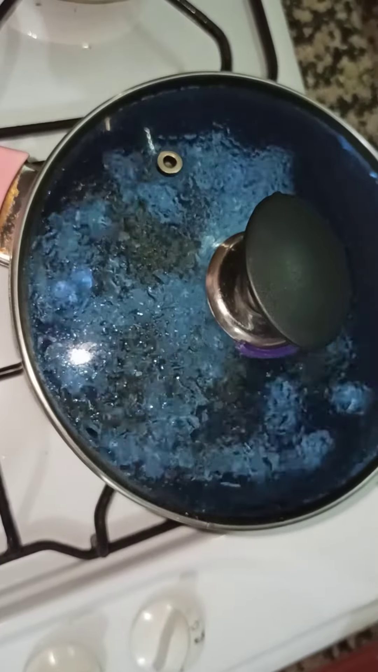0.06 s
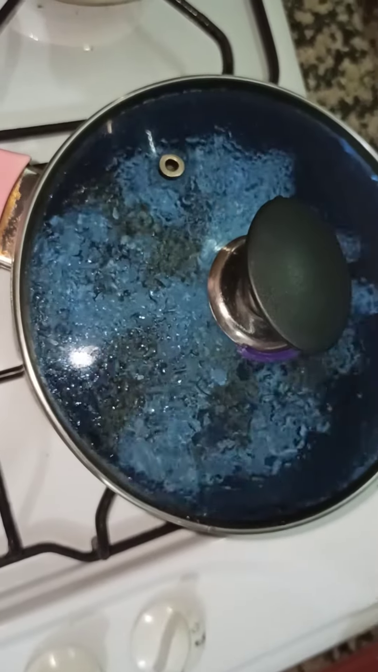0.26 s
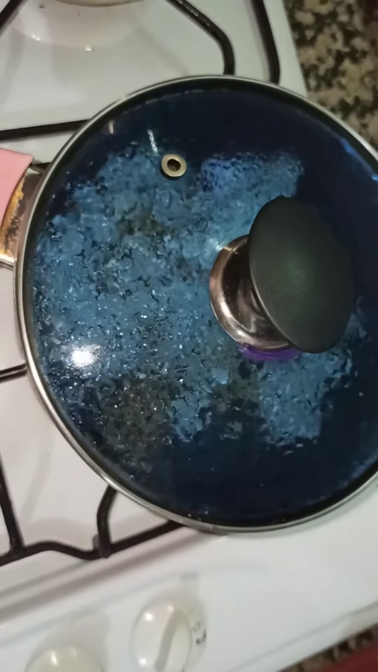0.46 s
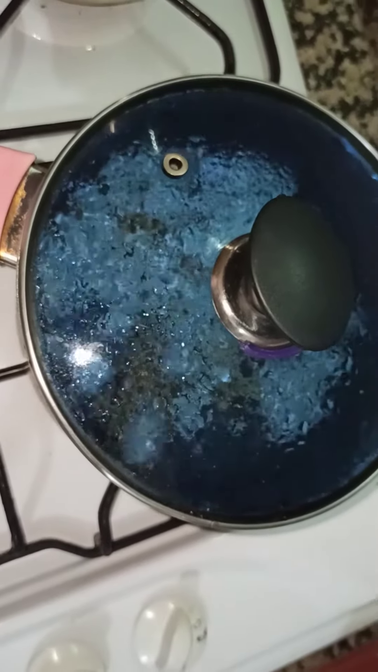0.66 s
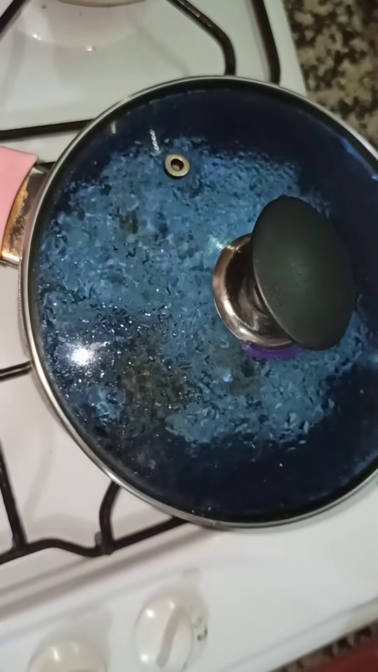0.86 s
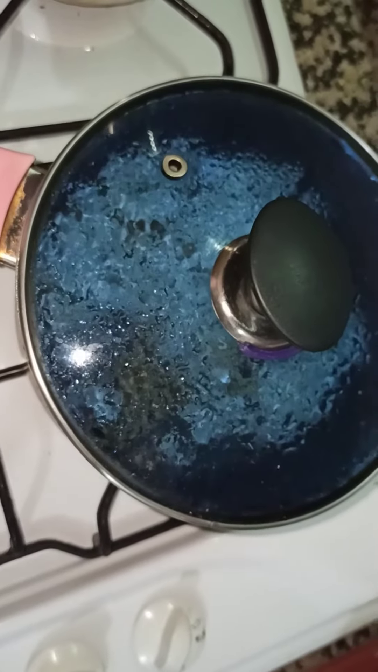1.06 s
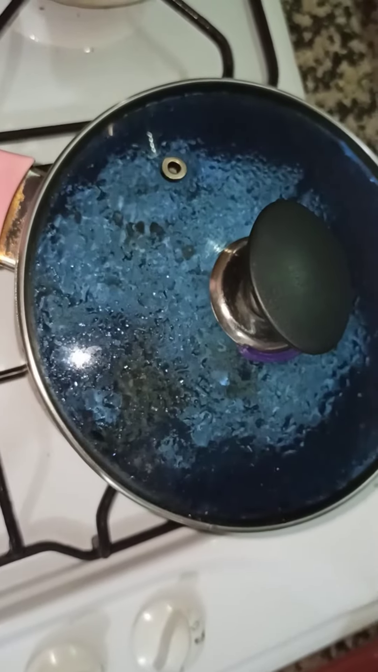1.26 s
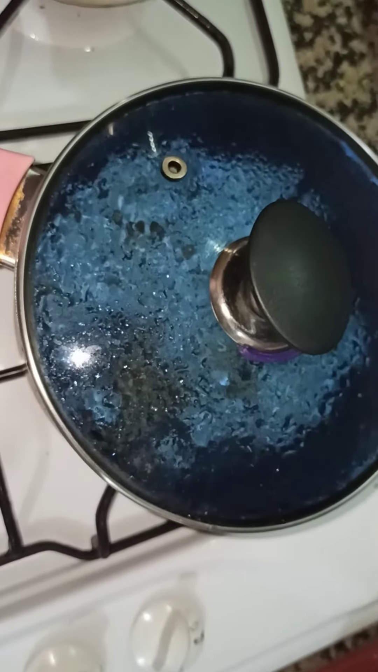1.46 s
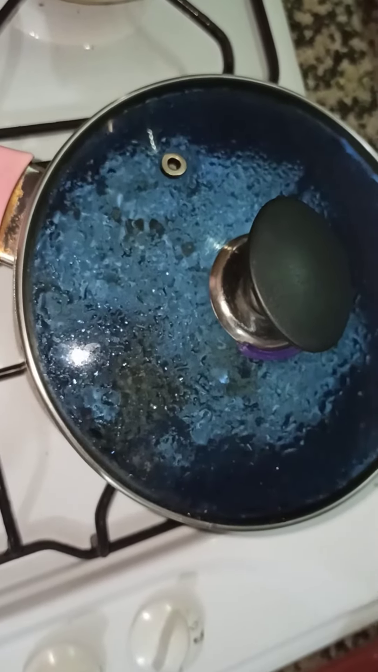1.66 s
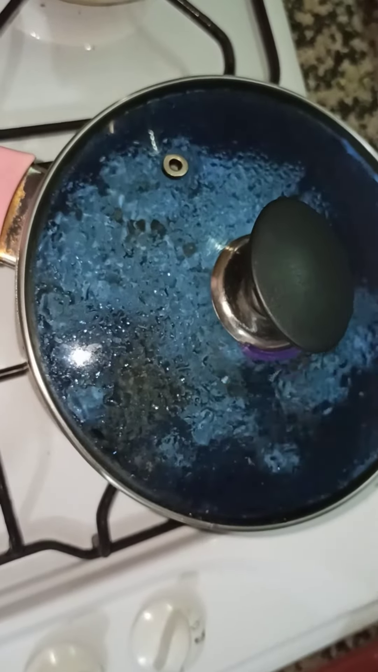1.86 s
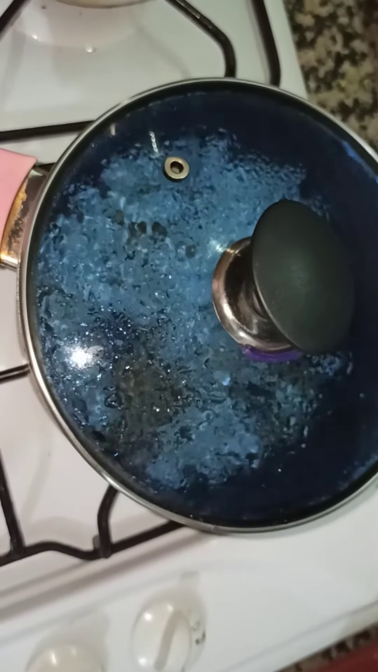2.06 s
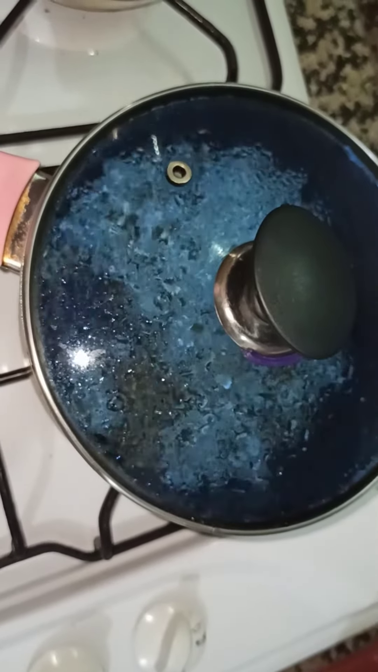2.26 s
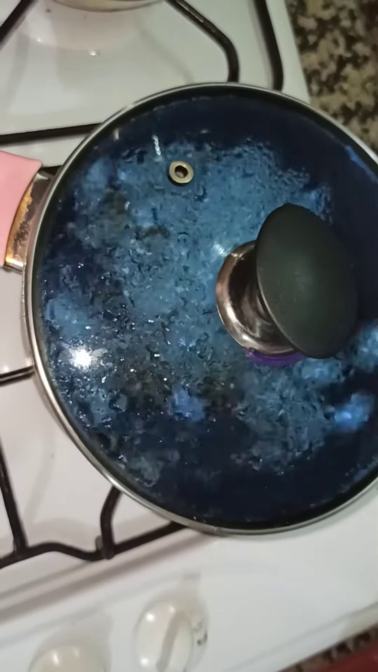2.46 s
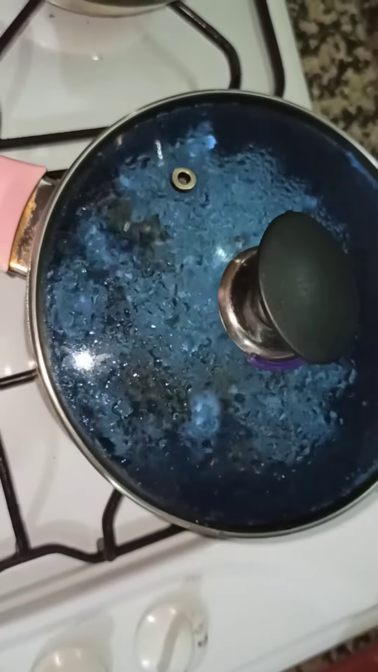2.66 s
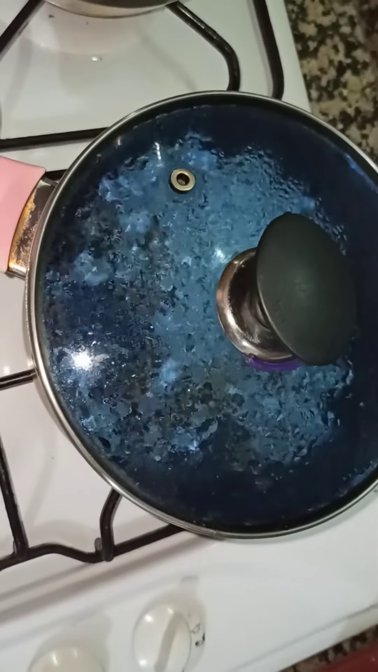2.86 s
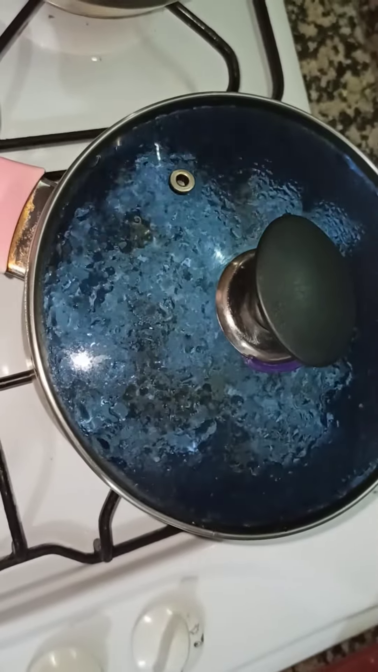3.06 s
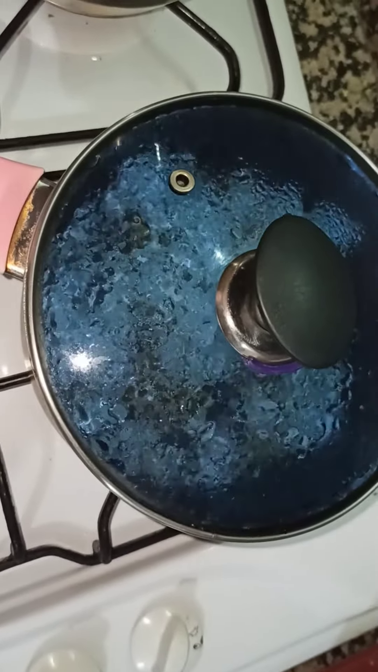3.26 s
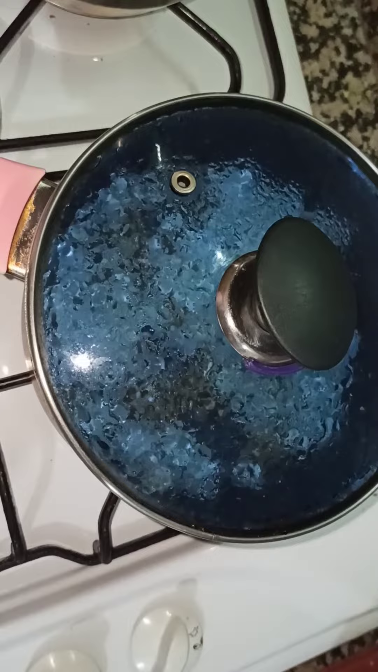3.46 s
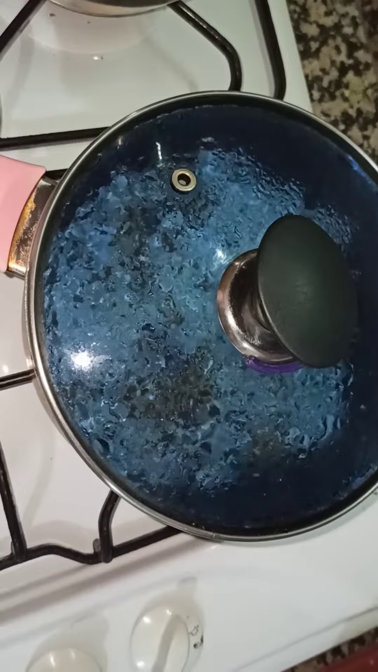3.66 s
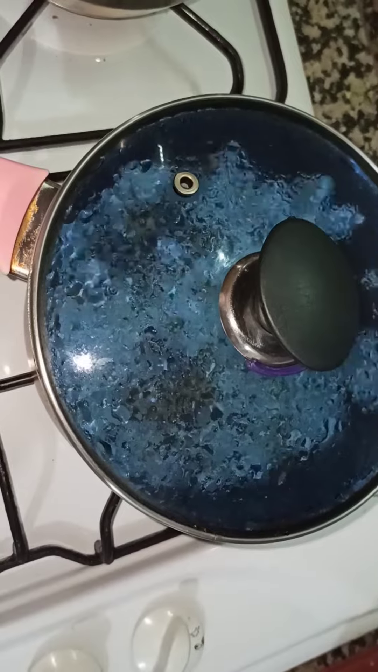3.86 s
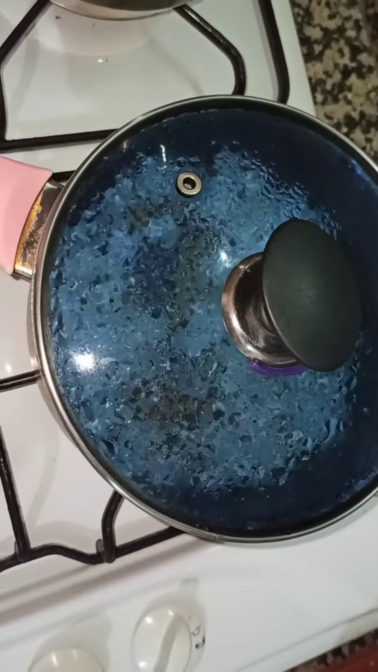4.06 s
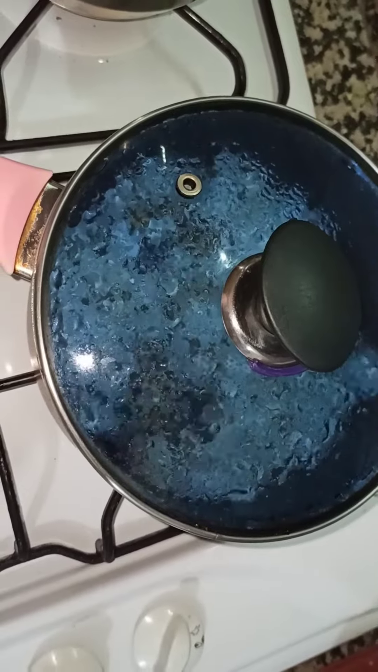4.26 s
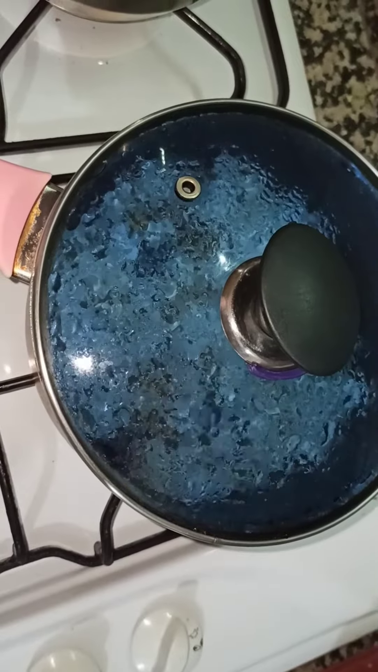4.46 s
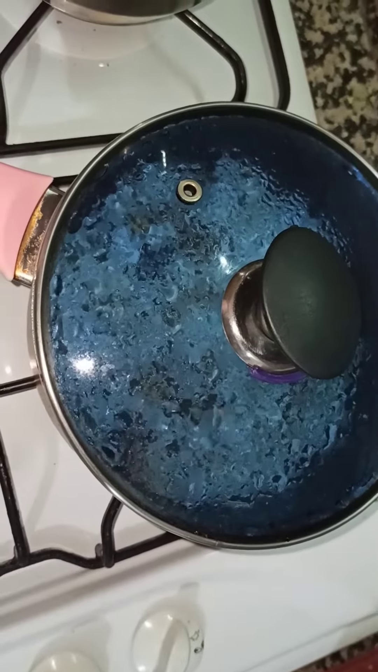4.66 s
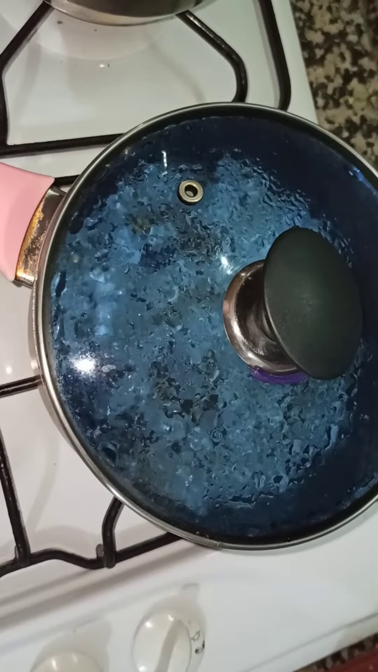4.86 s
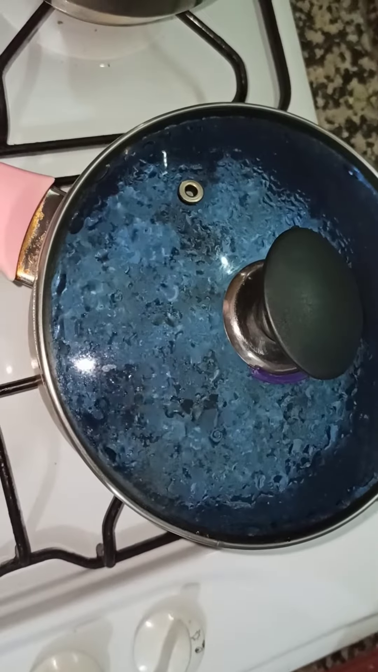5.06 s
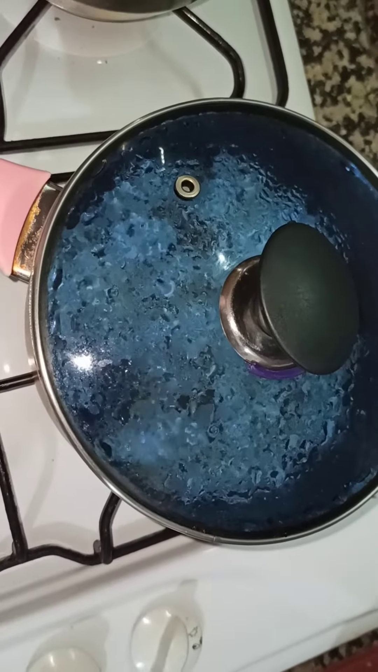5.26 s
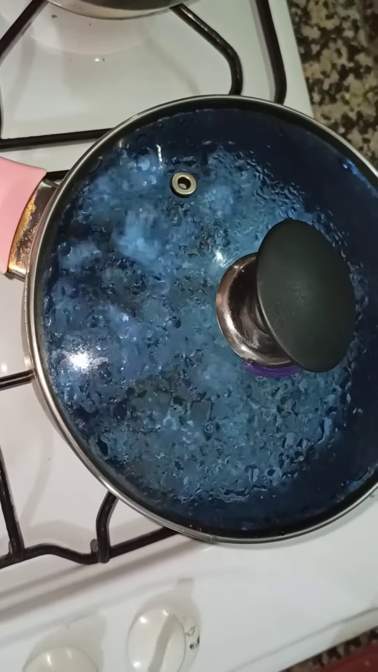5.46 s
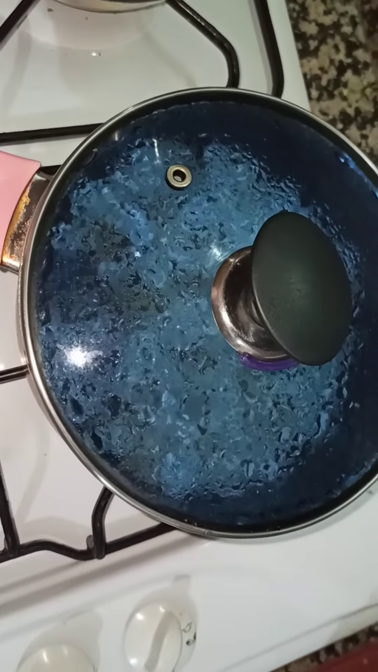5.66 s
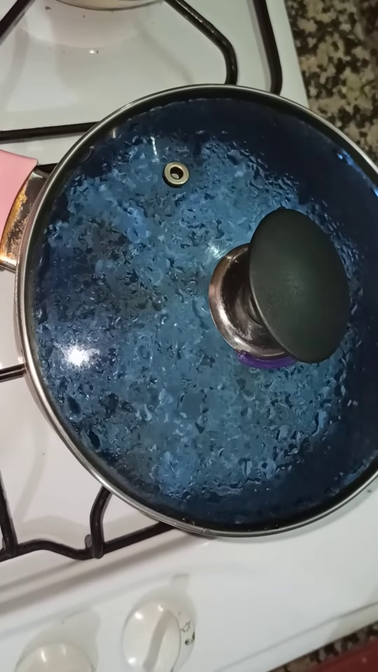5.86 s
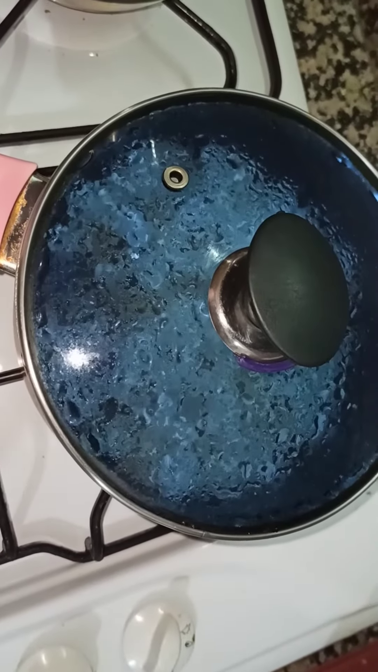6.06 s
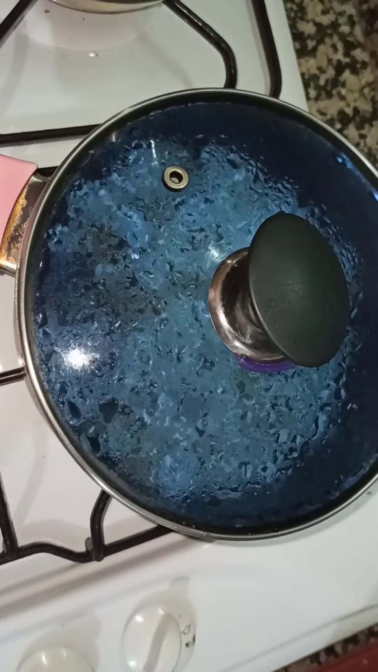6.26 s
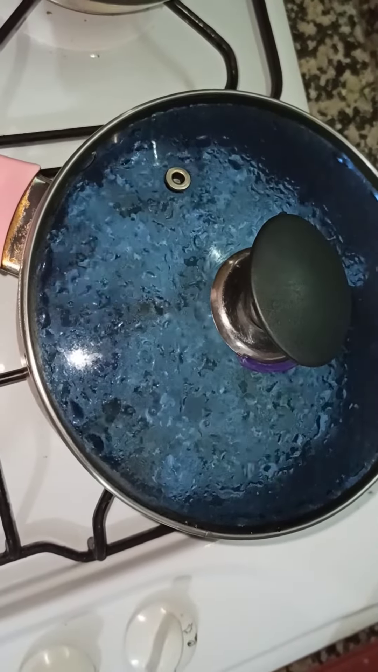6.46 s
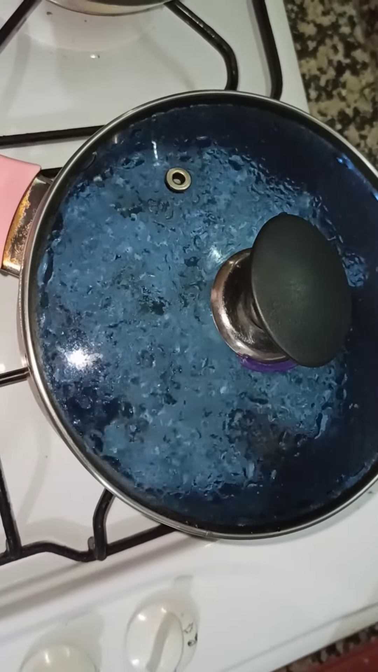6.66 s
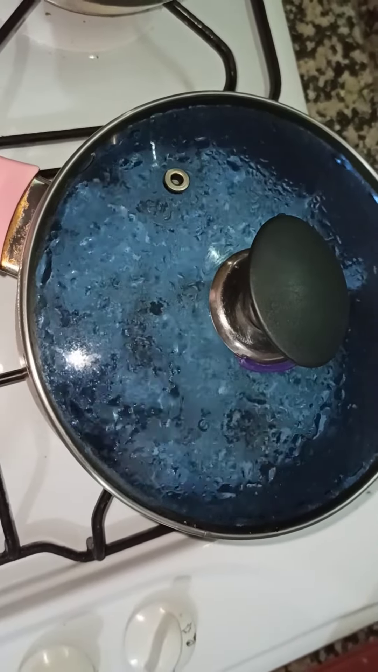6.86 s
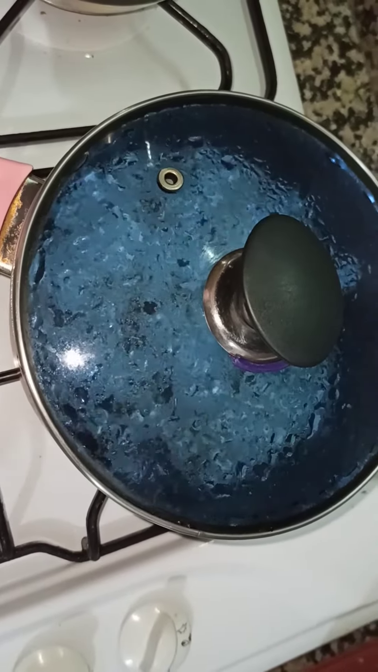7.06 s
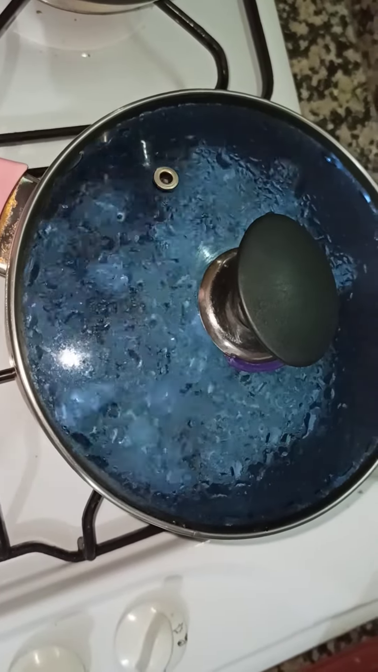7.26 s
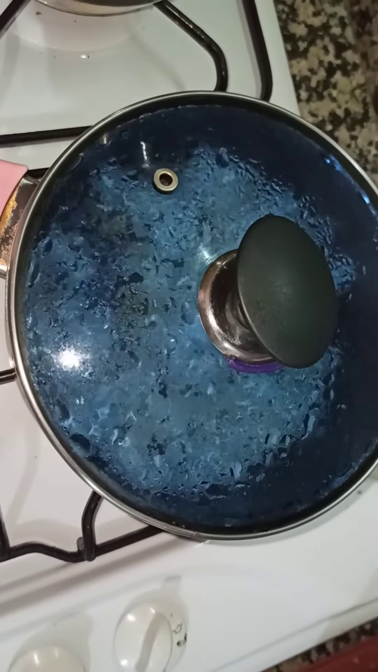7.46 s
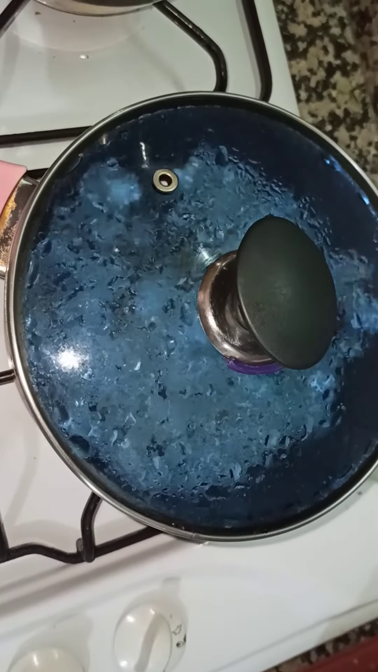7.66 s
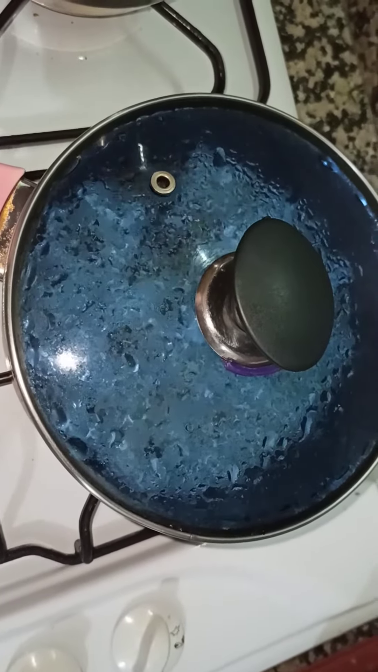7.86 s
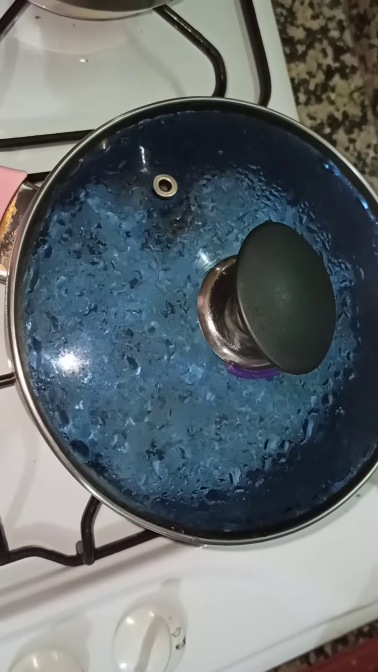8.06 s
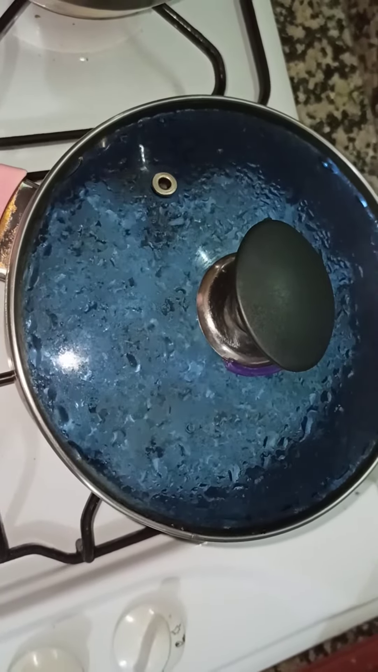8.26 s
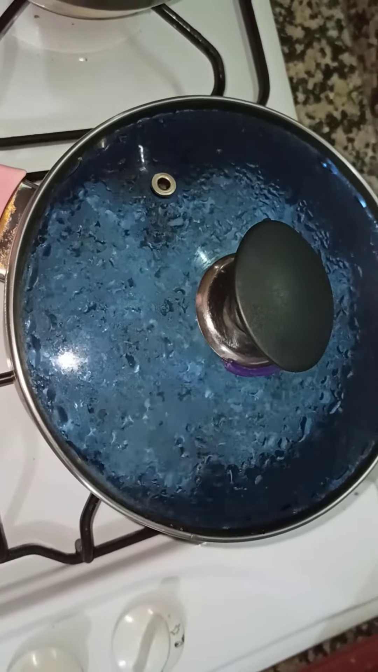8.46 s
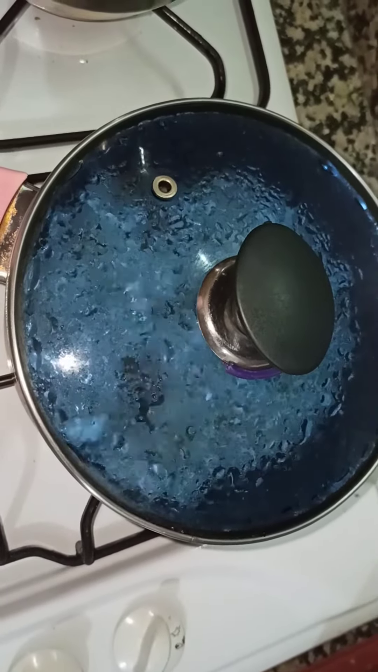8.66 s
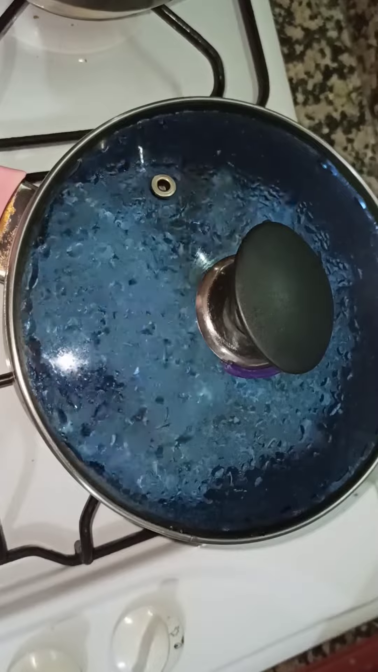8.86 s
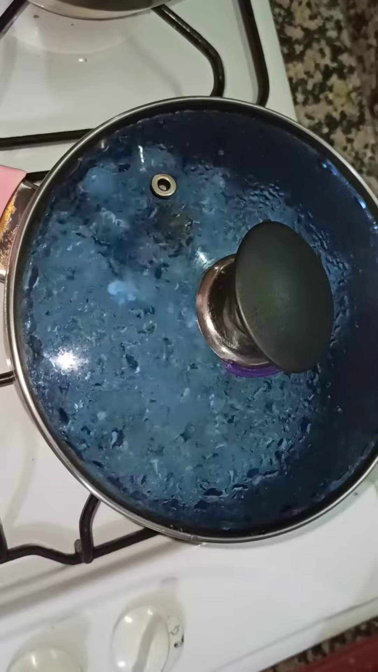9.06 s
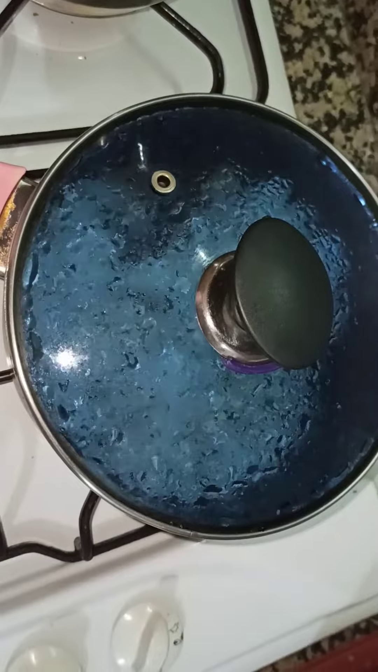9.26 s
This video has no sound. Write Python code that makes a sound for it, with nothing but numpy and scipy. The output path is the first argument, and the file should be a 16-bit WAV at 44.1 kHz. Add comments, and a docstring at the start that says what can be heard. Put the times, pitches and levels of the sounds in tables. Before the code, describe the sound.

Close above a lidded pot on a stove, popcorn is already popping over a faint, steady sizzle and low hum. From 0 to 0.8 s sharp cracks and weaker ticks come quickly, each with a small pot thump and a very short glassy ring, while loose kernels rattle. A dull kernel knock falls at 0.9 s, then a lull of about a second leaves mostly sizzle and fading rattle. Popping resumes at 1.8 s, with a strong crack at 2.1 s and uneven clusters until 5.5 s. Only one weak pop interrupts the gap before 6.3 s. The densest, loudest run comes from about 6.5 to 7.7 s. Pops then space out slightly but continue to about 9.3 s, with several woody knocks from 8.6 to 9.2 s and livelier rolling kernels at the end. The kitchen echo is short and faint.

```python
"""Popcorn pops in a covered pot with a glass lid on a gas stove, heard from close above.
From the start a faint sizzle and hum (shaped noise) lie below. Each pop cracks (noise bursts), thumps the
pot and rings the lid (driven resonators); thrown and loose kernels rattle and rumble on (gated noise, short
rings), and a short echo (feedback delays) follows. From 0.9 s single kernels knock dully on the wall."""
import sys
import numpy as np
from scipy import signal
from scipy.fft import rfft, irfft, next_fast_len
from scipy.io import wavfile

SR = 44100
rng = np.random.default_rng(int(sys.argv[2]) if len(sys.argv) > 2 else 0)


def dump(signal):
    """Clip the signal to [-1, 1] and save it as 16-bit WAV at the path in sys.argv[1]."""
    limited = np.clip(np.atleast_2d(signal).T, -1, 1)
    pcm = np.round(limited * 32767).astype(np.int16)
    wavfile.write(sys.argv[1], SR, pcm)


def makeup_ratio(level_db):
    """Linear amplitude ratio for a level in decibels (20 dB per factor of ten)."""
    decades = np.asarray(level_db, float) / 20
    return 10 ** decades


N = 411012


def rms_one(x):
    """Scale to rms 1."""
    return x / np.sqrt(np.mean(x ** 2) + 1e-20)


def at_hz(points, hz):
    """Read a table on a log-frequency axis."""
    points_hz, values = np.transpose(points)
    return np.interp(np.log(hz), np.log(points_hz), values)


def butter(x, hz, kind):
    """Second-order Butterworth filter design, applied once."""
    return signal.sosfilt(signal.butter(2, hz, kind, fs=SR, output="sos"), x)


# Left-right correlation of noise. Each row: frequency in Hz, likeness from 0 to 1.
LIKENESS = [(60, 1), (150, 0.9), (300, 0.9), (700, 0.62), (2000, 0), (15000, 0.27)]


def stereo_noise(spectrum):
    """Noise of a given spectrum, held flat above 8400 Hz, most alike left and right in the bass; rms 1."""
    size = next_fast_len(N)
    hz = np.maximum(np.arange(size // 2 + 1) * SR / size, 1)
    colour = makeup_ratio(at_hz(spectrum, np.minimum(hz, 8400)))
    mid, side = rfft(rng.standard_normal((2, size))) * colour
    alike = np.clip(at_hz(LIKENESS, hz), 0, 1)
    pair = np.sqrt(1 + alike) * mid + np.sqrt(1 - alike) * side * [[1], [-1]]
    return rms_one(irfft(pair, size)[:, :N])


# Sizzle and hum spectrum. Each row: frequency in Hz, relative density in dB per Hz.
HUSH_SPECTRUM = [(18, -58), (30, -47), (97, -6), (129, -7.5), (156, -32.5), (239, -30), (1370, -35),
                 (1610, -24.5), (2730, -43), (4290, -31), (5580, -48.5), (6440, -25), (9000, -40),
                 (11700, -73), (19800, -120)]
HUSH_DB = -56.5


def hush():
    """Sizzle and kitchen hum as one steady shaped noise."""
    return makeup_ratio(HUSH_DB) * stereo_noise(HUSH_SPECTRUM)


def ring(force, modes):
    """Two-pole resonators: a unit click sets each mode ringing as a decaying sine of its own height."""
    out = 0
    for hz, level_db, t60_s in modes:
        radius = makeup_ratio(-60 / (t60_s * SR))
        w = 2 * np.pi * hz / SR
        poles = [1, -2 * radius * np.cos(w), radius * radius]
        out = out + signal.lfilter([0, makeup_ratio(level_db) * np.sin(w)], poles, force + 1e-18)
    return out


# Pops and kernel hits. Each row: time in seconds, relative levels in dB of the crack, the blow on the pot
# and the strike on the lid, decay scale of the crack in seconds.
POPS = [(0.0044, -18.5, -33.5, -34.5, 0.062), (0.0343, -30.5, -47, -66, 0.2),
        (0.1102, -29, -35, -36, 0.046), (0.1236, -12, -34, -28.5, 0.049), (0.209, -29, -54, -69, 0.036),
        (0.2546, -21.5, -34.5, -28, 0.12), (0.3075, -9.5, -21.5, -32.5, 0.11),
        (0.3352, -22, -28, -38, 0.19), (0.393, -17.5, -55, -37.5, 0.086), (0.5375, -33, -30, -43, 0.078),
        (0.5642, -28, -49, -47, .037), (0.6556, -28, -57, -36, 0.056), (0.673, -30, -28.5, -35, 0.19),
        (0.782, -25, -40, -33, 0.093), (0.7928, -14, -29.5, -28.5, .11), (0.802, -10, -49, -26.5, 0.057),
        (1.8405, -12.5, -31, -33, 0.061), (1.8995, -24.5, -35, -26, .13), (1.953, -28, -41, -58, 0.092),
        (1.9843, -33, -44, -44, 0.51), (2.0715, -32.5, -64, -71, 0.028), (2.134, -6, -21, -24, 0.043),
        (2.1914, -43, -45, -35, 0.039), (2.3247, -20.5, -26.5, -35.5, 0.19), (2.366, -28.5, -37, -46, 0.1),
        (2.4351, -16.5, -19.5, -32, 0.15), (2.559, -32, -42, -49, 0.1), (2.6488, -12, -28, -23.5, 0.06),
        (2.8101, -16.5, -15, -23, 0.05), (2.8502, -16, -33, -45, .065), (2.9109, -22, -32.5, -34, 0.062),
        (2.9751, -18.5, -37.5, -30.5, 0.079), (3.1623, -11, -30.5, -28.5, 0.058),
        (3.2951, -20, -28, -32, 0.14), (3.4068, -36, -34, -38, 0.5), (3.457, -21.5, -42, -57, 0.039),
        (3.53, -26.5, -50, -37.5, .035), (3.7111, -23.5, -35, -39, 0.14), (3.7424, -22, -57, -50, 0.055),
        (3.8476, -31.5, -32, -39, 0.13), (3.8598, -24.5, -36, -37.5, 0.13), (3.8784, -31.5, -47, -46, 0.29),
        (3.92, -13.5, -37.5, -26, 0.14), (3.9502, -40, -65, -35, 0.23), (4.1594, -11.5, -27.5, -23, 0.063),
        (4.228, -10.5, -31, -22.5, 0.083), (4.459, -43.5, -36, -43.5, 0.24), (4.5316, -23, -38, -31, 0.059),
        (4.61, -40.5, -49, -39, 0.15), (4.884, -10, -29, -26.5, .066), (4.994, -31, -54, -49, 0.12),
        (5.036, -36.5, -65, -49.5, 0.4), (5.1255, -34.5, -58, -61, 0.031),
        (5.2731, -15.5, -19, -24.5, 0.064), (5.32, -30.5, -39, -41, 0.088),
        (5.461, -29.5, -25.5, -33, 0.11), (5.481, -29, -33, -46, 0.3), (5.525, -16, -37, -77, 0.022),
        (5.8279, -36.5, -50, -65, 0.05), (6.3001, -24.5, -27, -33, 0.21),
        (6.3236, -17.5, -41, -27.5, 0.067), (6.3715, -22.5, -38, -40, 0.095),
        (6.5097, -26.5, -21.5, -39, 0.062), (6.5237, -16, -28, -29.5, 0.13), (6.6652, -9, -41, -27.5, .054),
        (6.754, -36, -25.5, -39, 0.11), (6.774, -26.5, -44, -46, 0.095), (6.8308, -22, -37, -50, 0.12),
        (6.8768, -15, -25, -29.5, 0.046), (6.9036, -23, -42, -34.5, 0.04), (6.954, -40, -48, -43, 0.056),
        (7.062, -34.5, -51, -35, .09), (7.0801, -21, -26, -25.5, 0.087), (7.1325, -10, -31, -27.5, 0.07),
        (7.224, -12.5, -32, -32.5, 0.06), (7.2501, -15.5, -20.5, -27.5, 0.13),
        (7.3813, -8.5, -27.5, -34, 0.064), (7.4081, -17.5, -48, -29, 0.12), (7.4345, -16, -32, -31, 0.044),
        (7.601, -21.5, -30, -29, 0.14), (7.658, -24.5, -44, -38, .11), (7.745, -37, -49, -56, 0.033),
        (7.9193, -13.5, -28, -26, 0.072), (8.0149, -27, -33.5, -41.5, 0.084),
        (8.0532, -37, -42, -42.5, 0.26), (8.0686, -26.5, -54, -48, 0.053), (8.3587, -20.5, -25, -46, 0.058),
        (8.517, -33, -33.5, -37.5, 0.25), (8.6368, -24.5, -33, -30.5, 0.094), (8.7748, -18, -26, -25, 0.15),
        (8.8953, -18, -25, -33, 0.064), (8.935, -36, -36, -40, 0.17), (9.0623, -20.5, -28.5, -26, 0.051),
        (9.1267, -32, -48, -45, 0.07), (9.1506, -16, -22.5, -25, 0.069), (9.1827, -29, -31.5, -33, .17),
        (9.3101, -20.5, -25.5, -33.5, 0.12)]
ONSET_S, BLOW_LEADS_S = 0.0041, 0.00203   # hull starts to tear, pot is pushed: both ahead of the row's time


def bursts(levels_db, decays_s, rise_s):
    """Envelopes of all pops, one per row of levels: quick rise, steep fall, weaker afterclatter; powers add."""
    peaks = makeup_ratio(np.atleast_2d(levels_db))
    power = np.zeros((len(peaks), N + SR))
    t = np.arange(SR // 5) / SR
    for (s, *_), peak, decay_s in zip(POPS, peaks.T, np.clip(decays_s, 0.02, 0.3)):
        fall = np.exp(-2 * np.log(1000) * np.maximum(t - rise_s, 0) / decay_s)
        shape = np.minimum(t / rise_s, 1) ** 3 * (fall ** 0.72 + 0.055 * fall ** 0.32)
        start = max(round((s - ONSET_S) * SR), 0)
        power[:, start:start + len(t)] += peak[:, None] ** 2 * shape
    return np.sqrt(power[:, :N])


def blows(level_db, contact_s):
    """One soft push per pop, its area set by the level."""
    clicks = np.zeros(N)
    clicks[[min(round((row[0] - BLOW_LEADS_S) * SR), N - 1) for row in POPS]] = makeup_ratio(level_db)
    push = np.hanning(round(contact_s * SR) + 3)
    return np.convolve(clicks, push / push.sum())[:N]


def grains(per_s, spread_db, smooth):
    """Uneven contacts of a few milliseconds over a smooth share, as a flickering gain of rms 1."""
    heights = makeup_ratio(spread_db * np.minimum(rng.exponential(1, N), 3))
    clicks = (rng.random(N) < per_s / SR) * heights
    contacts = rms_one(signal.lfilter([1], [1, -0.992], clicks))
    return rms_one(smooth + contacts)


# Crack spectrum. Each row: frequency in Hz, relative density in dB per Hz.
CRACK_SPECTRUM = [(240, -36), (400, -38), (1340, -3.5), (1510, -1.5), (1700, -5.5), (2680, -4.5),
                  (4400, -1), (5560, -9.5), (6940, -3.5), (9000, -18), (11700, -46), (19800, -120)]


def hull_crack(bands, envelopes):
    """The tearing hull: noise in bands, each with its own burst envelopes."""
    hull = stereo_noise(CRACK_SPECTRUM)
    return makeup_ratio(-2.0) * sum(env * butter(hull, band, "band") for band, env in zip(bands, envelopes))


# Modes of lid and pot wall. Each row: frequency in Hz, level in dB, t60 in seconds.
LID_MODES = [(594, -18.5, 0.11), (990, -17, 0.13), (1946, -42, 0.18), (2465, -5.5, 0.059),
             (2840, -27, 0.12), (3336, -5, 0.048), (3716, -12, 0.073), (4468, 1.5, 0.033),
             (5220, -5, 0.023), (5970, -2, 0.0091), (6380, -3, 0.016), (6777, 6.5, 0.017),
             (7305, 1.5, 0.029), (7520, 1.5, 0.016), (8136, -4.5, 0.031)]


def lid_ring(bands, envelopes, shake):
    """Hull fragments shake the lid and wall modes, band by band."""
    out = 0
    for (low, high), env in zip(bands, envelopes):
        modes = [mode for mode in LID_MODES if low <= mode[0] < high]
        out = out + makeup_ratio(-30) * ring(env * shake, modes)
    return out


# Clearest note of the glass. Each row: frequency in Hz, level in dB, t60 in seconds.
LID_NOTE = [(1490, 0, .05)]


def lid_note(note_db, decay_s, shake):
    """The note is struck once and then kept going by the fragments."""
    fragments = makeup_ratio(-24) * bursts(note_db, 0.4 * decay_s, rise_s=0.006) * shake
    return makeup_ratio(4) * ring(blows(note_db, contact_s=0.00044) + fragments, LID_NOTE)


# Pot rocking on the grate. Each row: frequency in Hz, level in dB, t60 in seconds.
THUMP_MODES = [(106, -11, 0.2), (125.6, 2.5, 0.073)]


def pot_thump(blow_db):
    """The blow rocks the pot in its lowest modes."""
    return makeup_ratio(6.0) * ring(blows(blow_db, contact_s=0.0021), THUMP_MODES)


# Metal bottom flexing. Each row: frequency in Hz, level in dB, t60 in seconds.
FLOOR_MODES = [(211.5, -4.5, 0.15), (295.3, 0.5, 0.18), (394, -10, 0.22)]


def pot_floor(floor_db):
    """The metal bottom flexes with a short push."""
    return makeup_ratio(2.5) * ring(blows(floor_db, contact_s=0.00082), FLOOR_MODES)


# Pot rumble spectrum. Each row: frequency in Hz, relative density in dB per Hz.
RUMBLE_SPECTRUM = [(18, -56.5), (30, -10), (119, 2.5), (254, -8), (297, -1.5), (357, -8), (455, -10),
                   (900, -15), (1170, -11), (1980, -120)]


def landing(floor_db, decay_s):
    """Kernels landing again keep the pot murmuring longer than the crack."""
    return makeup_ratio(-1) * bursts(floor_db, 2.4 * decay_s, rise_s=0.012) * stereo_noise(RUMBLE_SPECTRUM)


COLOUR_SPREAD_DB = 2.2
FLEX_DB, FLEX_FROM_BLOW, FLEX_FROM_STRIKE = -8, 0.66, 0.19   # bottom flexes with blow, a little with strike


def pops():
    """The crack of the hull and its fragments shake lid and wall; the blow drives the low modes."""
    _, crack_db, blow_db, note_db, decay_s = np.transpose(POPS)
    floor_db = FLEX_DB + FLEX_FROM_BLOW * blow_db + FLEX_FROM_STRIKE * note_db
    edges_hz = np.array([300, 1200, 2200, 3600, 5500, 9500, 17000])
    bands = list(zip(edges_hz, edges_hz[1:]))
    # low bands follow the lid strike, high bands the crack; each pop is coloured at random
    sharp = np.clip(np.log(edges_hz[1:, None] / 1200) / np.log(5.0), 0, 1)
    levels_db = sharp * crack_db + (1 - sharp) * (note_db + 11.5)
    levels_db = levels_db + rng.normal(0, COLOUR_SPREAD_DB, levels_db.shape)
    rough = grains(per_s=1000, spread_db=2.0, smooth=0.28)
    cracks = bursts(levels_db, decay_s, rise_s=0.0083) * rough
    # only the first, hardest fragments ring the glass
    strikes = bursts(levels_db, 0.6 * decay_s, rise_s=0.005) * rough
    shake = stereo_noise([(300, 0.0028), (16000, 0.014)])   # practically white
    lid = lid_ring(bands, strikes, shake) + lid_note(note_db, decay_s, shake)
    pot = pot_thump(blow_db) + pot_floor(floor_db) + landing(floor_db, decay_s)
    return hull_crack(bands, cracks) + lid + pot


FLIGHT_S, SETTLE_T60_S = 0.032, 0.47   # flight is a time constant


def thrown(level_db):
    """Kernels landing after each pop: a swell over the flight, then settling; powers add."""
    throws = np.zeros(N)
    throws[[min(round(row[0] * SR), N - 1) for row in POPS]] = makeup_ratio(level_db) ** 2
    fly = np.exp(-1 / (FLIGHT_S * SR))
    settle = makeup_ratio(-120 / (SETTLE_T60_S * SR))   # a power, so twice 60 dB
    return np.sqrt(signal.lfilter([1 - fly], np.convolve([1, -fly], [1, -settle]), throws + 1e-18))


BOUNCES_PER_S, BOUNCE_DB, BOUNCE_LOW_HZ, BOUNCE_HIGH_HZ = 45, 4.5, 630, 3600


def bounces(rattle):
    """Random soft knocks that follow the rattle, each at one of eight pitches, down 60 dB in 11 cycles."""
    heights = makeup_ratio(5.0 * np.minimum(rng.exponential(1, N), 3))
    clicks = (rng.random(N) < BOUNCES_PER_S / SR) * heights * rattle
    dealt = rng.integers(0, 8, N)
    pitches_hz = np.geomspace(BOUNCE_LOW_HZ, BOUNCE_HIGH_HZ, 8)
    return sum(ring(clicks * (dealt == k), [(hz, BOUNCE_DB, 11.0 / hz)]) for k, hz in enumerate(pitches_hz))


# How briskly loose kernels roll about. Each row: time in seconds, level in dB.
ROLLING = [(0.0, -45), (0.21, -43.5), (1.17, -65), (1.87, -72), (2.02, -46), (3.35, -45.5), (3.56, -58),
           (4.05, -49.5), (4.65, -65.5), (5.22, -55.5), (6.31, -62), (6.54, -49), (7.34, -56), (7.79, -60),
           (8.1, -62.5), (9.32, -44.5)]
ROLL_RUMBLE_DB, RUMBLE_FOLLOWS = -24.5, 0.53   # rumble swings less than the rolling (dB per dB)
THROWN_RATTLE_DB, THROWN_RUMBLE_DB = -39.5, -21


def tumble():
    """Dense small contacts of loose and thrown kernels on wall, lid and bottom."""
    _, crack_db, blow_db, _, _ = np.transpose(POPS)
    rolling_db = np.interp(np.arange(N) / SR, *np.transpose(ROLLING))
    rattle = np.hypot(makeup_ratio(rolling_db), thrown(crack_db + THROWN_RATTLE_DB))
    knocking = bounces(rattle)
    rattle = rattle * grains(per_s=400, spread_db=4.0, smooth=0.6)
    contacts = makeup_ratio(-2.0) * rattle * stereo_noise(CRACK_SPECTRUM)
    white = stereo_noise([(300, 0), (16000, 0)])
    wall = makeup_ratio(-30.5) * ring(rattle * white, LID_MODES + LID_NOTE)
    roll_rumble = makeup_ratio(ROLL_RUMBLE_DB + RUMBLE_FOLLOWS * rolling_db)
    rumble = np.hypot(roll_rumble, thrown(blow_db + THROWN_RUMBLE_DB))
    return contacts + wall + knocking + rumble * stereo_noise(RUMBLE_SPECTRUM)


KITCHEN_T60_S, WALL_CUT_HZ, KITCHEN_DB = 0.22, 6000, -18   # t60 in the bass of the loops


def kitchen(x):
    """Echo from the walls: six feedback delays a side, duller on every round."""
    size = next_fast_len(N + SR)
    w = 2 * np.pi * np.arange(size // 2 + 1) / size
    dull = np.exp(-2 * np.pi * WALL_CUT_HZ / SR)
    wall = (1 - dull) / (1 - dull * np.exp(-1j * w))
    echo = np.zeros((2, len(w)), complex)
    for k, lag_s in enumerate(rng.uniform(0.008, 0.03, 12)):
        loop = makeup_ratio(-60 * lag_s / KITCHEN_T60_S) * wall * np.exp(-1j * w * round(lag_s * SR))
        echo[k % 2] += loop / (1 - loop) * (-1) ** (k // 2)
    return irfft(rfft(x, size) * echo, size)[:, :N]


# Single kernels on the wall. Each row: time in seconds, relative level in dB, pitch in Hz.
KNOCKS = [(0.896, -28, 1210), (2.191, -34, 1300), (3.351, -29, 970), (4.055, -21, 1150), (7.085, -22, 1030),
          (8.605, -33, 950), (8.698, -22, 1140), (8.738, -30, 910), (8.976, -28, 1050), (9.126, -34, 890),
          (9.183, -17, 1060)]


def knocks():
    """A short, rough, woody ring of three modes, at another pitch for each kernel."""
    out = np.zeros(N)
    n = np.arange(90)
    for s, level_db, hz in KNOCKS:
        force = np.zeros(N)
        force[round(s * SR):][:90] = rng.normal(1, 1, 90) * np.cos(2 * np.pi * hz * n / SR) / 45
        modes = [(hz, level_db, 0.011), (1.45 * hz, level_db - 3, 0.009), (0.7 * hz, level_db - 5, 0.012)]
        out += ring(force, modes)
    return out


BASS_CUT_HZ = 133   # a pot is too small to radiate deep bass


def scene():
    """The pot close by, its echo from the walls and the steady background."""
    background = hush()
    pot = butter(pops() + tumble() + knocks(), BASS_CUT_HZ, "high")
    # echo without bass, so that the bass stays alike left and right
    echo = butter(kitchen(pot), 350, "high")
    return pot + makeup_ratio(KITCHEN_DB) * echo + background


def top_cut(x):
    """Nothing passes above the cut-off."""
    return signal.sosfilt(signal.butter(12, 16830, fs=SR, output="sos"), x)


# Treble shape: a gap near 11 kHz, a strong band above it, next to nothing past 16 kHz.
# Each row: frequency in Hz, gain in dB.
TREBLE_SHAPE = [(8400, 0), (8800, -0.5), (10600, -7), (11100, -23.5), (11500, -20), (11600, 3),
                (15700, -4.5), (15900, -34), (17000, -56)]
# Left port against right. Each row: frequency in Hz, level difference in dB.
LEFT_LOUDER = [(60, -3.5), (120, 2), (240, -4.5), (480, 1), (950, -0.5), (1890, -4.0), (3770, -1.5),
               (7520, 5.5), (15000, -6.5)]
# Left port against right. Each row: frequency in Hz, phase lead in radians, reduced below 700 Hz.
LEFT_LEADS = [(0, -3.5), (950, -0.4), (1290, 2), (1550, 0.43), (2240, -0.5), (2760, -12), (3360, -8.5),
              (4390, -8), (5940, -4.5), (6460, -0.75), (10200, 14.5), (11300, 12.5), (14600, 6.5),
              (16400, 26)]


def record(dry):
    """Two microphone ports with their own level and phase, a treble with a gap and an end, rounded peaks."""
    size = next_fast_len(N + SR // 10)
    hz = np.maximum(np.arange(size // 2 + 1) * SR / size, 1)
    # long waves reach both ports in step
    leads = np.interp(hz, *np.transpose(LEFT_LEADS)) * np.minimum(hz / 700, 1) ** 2
    left = makeup_ratio(at_hz(LEFT_LOUDER, hz) / 2) * np.exp(0.5j * leads)
    shaped = rfft(dry, size) * makeup_ratio(at_hz(TREBLE_SHAPE, hz))
    x = irfft(shaped * [left, 1 / left], size)[:, :N]
    return top_cut(0.87 * np.tanh(x / 0.93))


dry = scene()
out = record(dry)
dump(out)
```